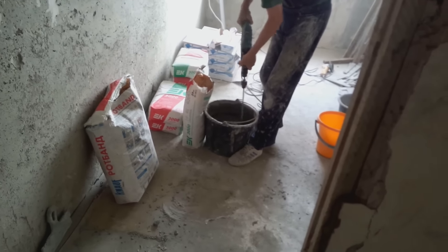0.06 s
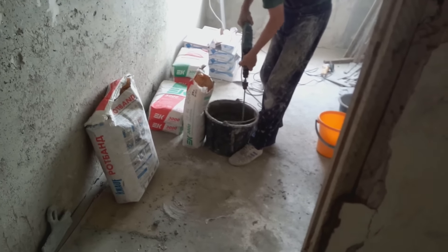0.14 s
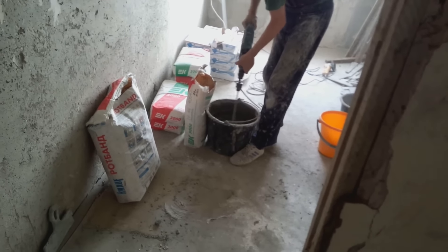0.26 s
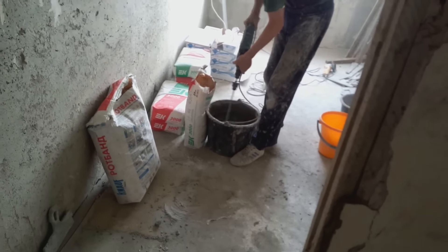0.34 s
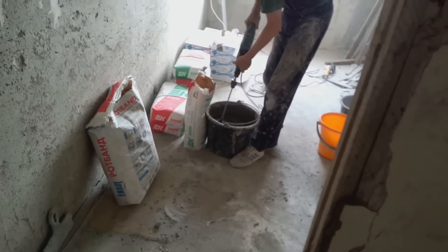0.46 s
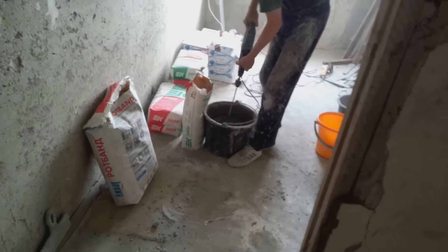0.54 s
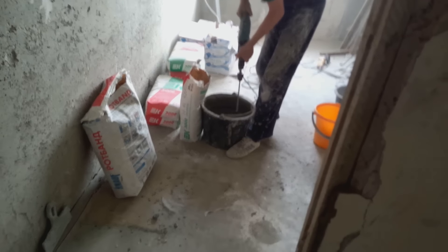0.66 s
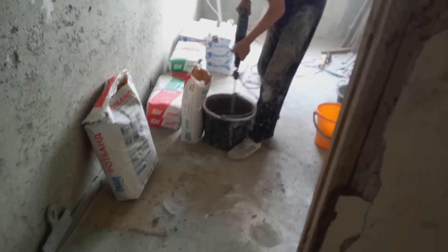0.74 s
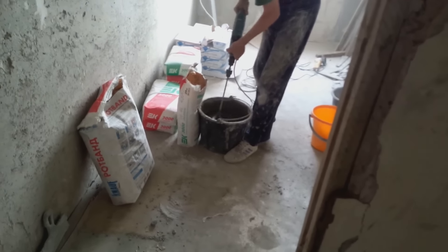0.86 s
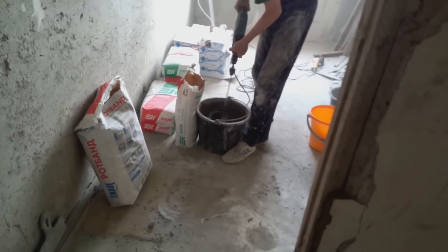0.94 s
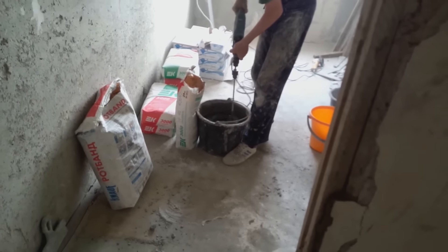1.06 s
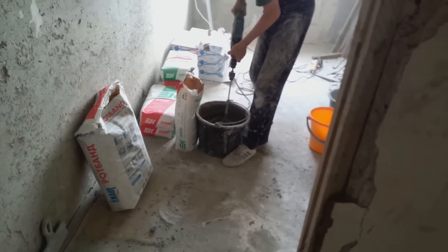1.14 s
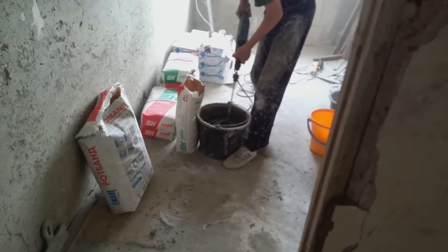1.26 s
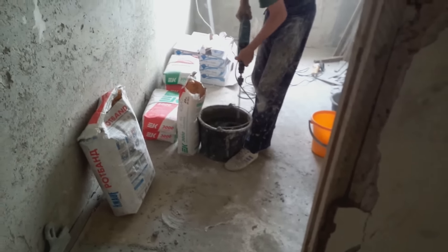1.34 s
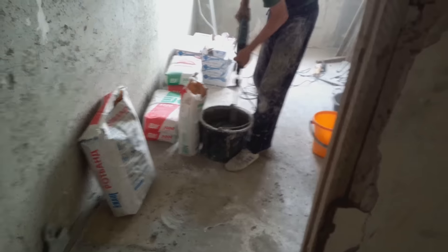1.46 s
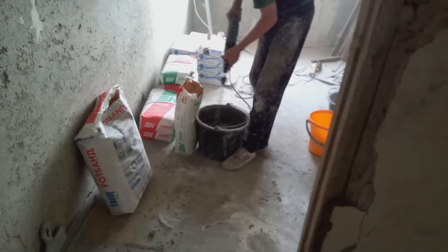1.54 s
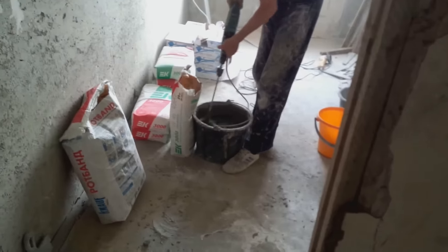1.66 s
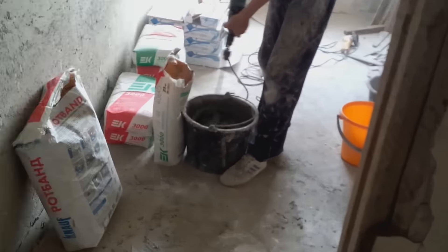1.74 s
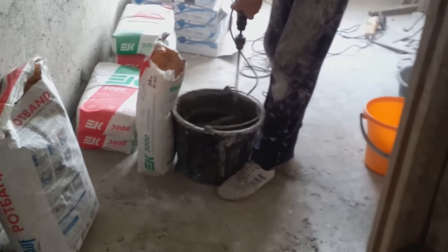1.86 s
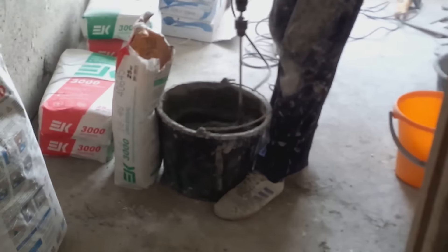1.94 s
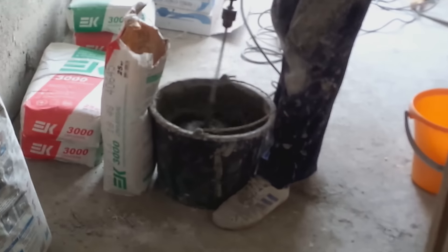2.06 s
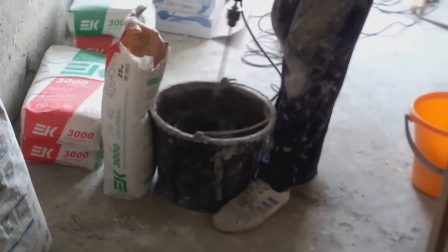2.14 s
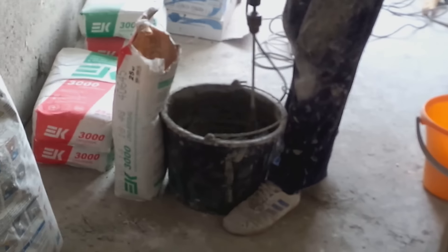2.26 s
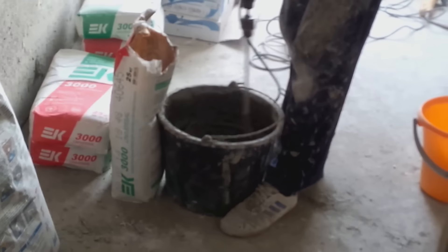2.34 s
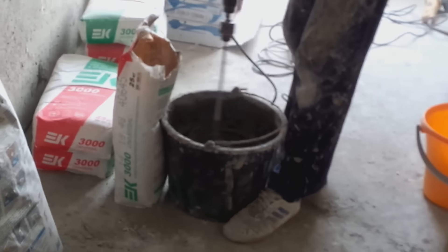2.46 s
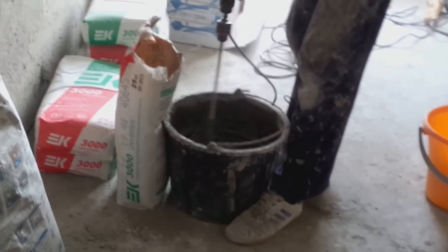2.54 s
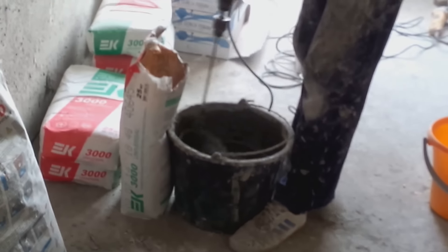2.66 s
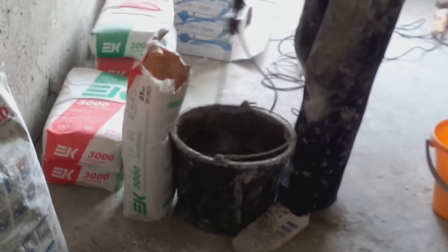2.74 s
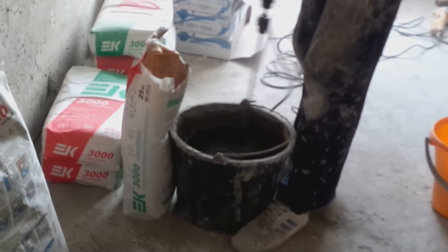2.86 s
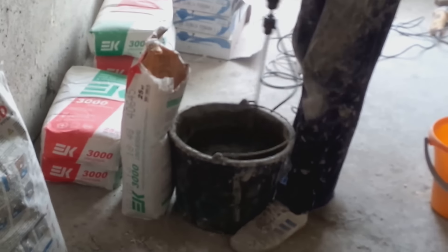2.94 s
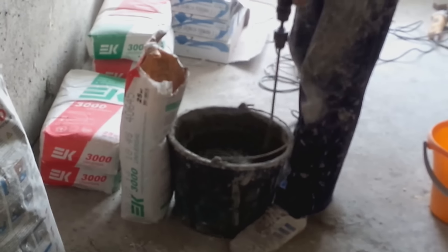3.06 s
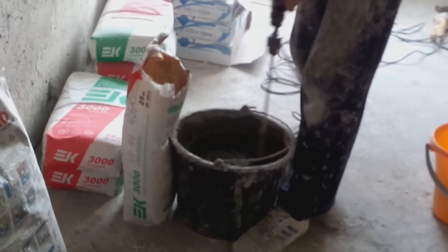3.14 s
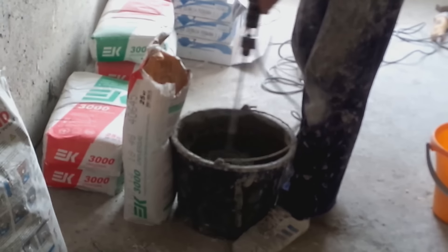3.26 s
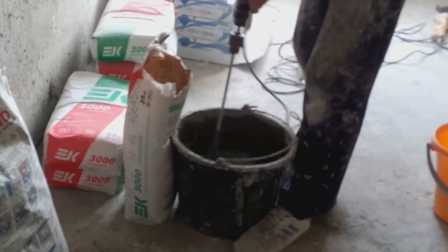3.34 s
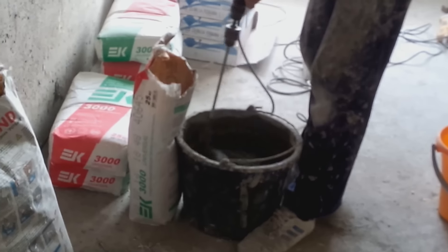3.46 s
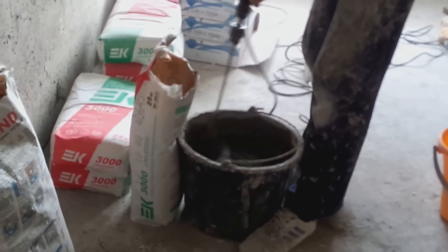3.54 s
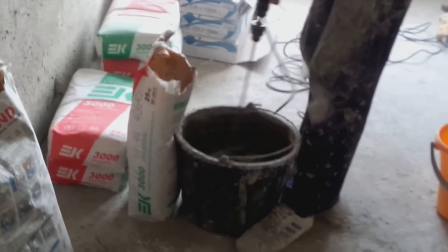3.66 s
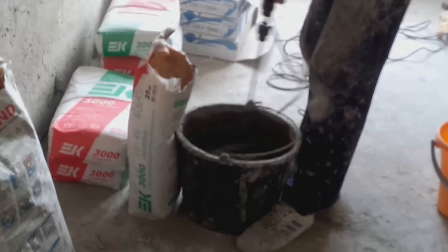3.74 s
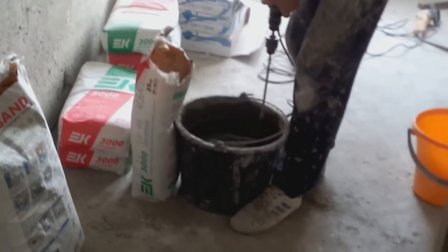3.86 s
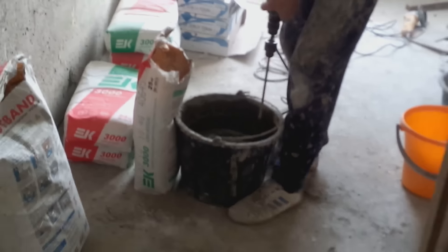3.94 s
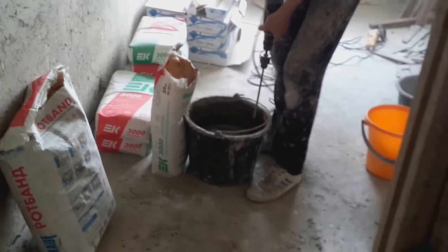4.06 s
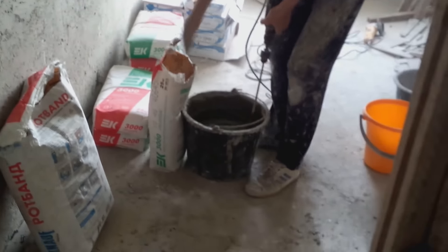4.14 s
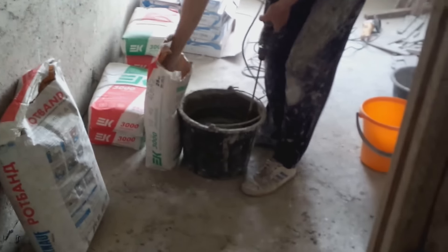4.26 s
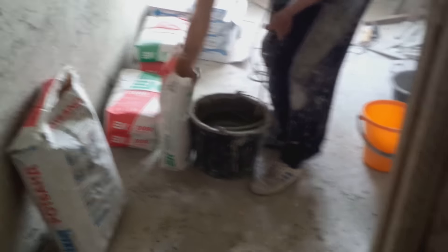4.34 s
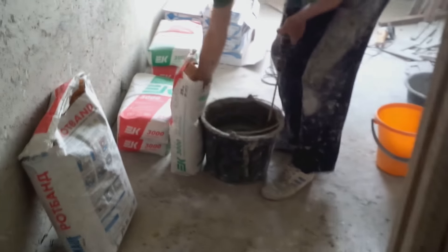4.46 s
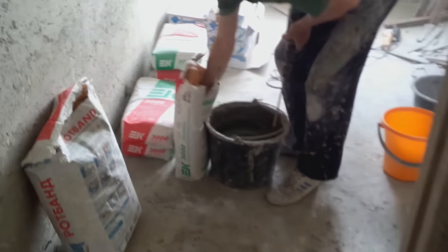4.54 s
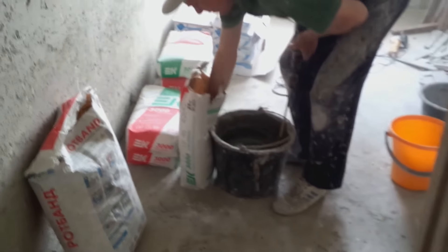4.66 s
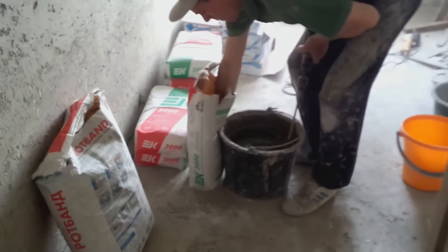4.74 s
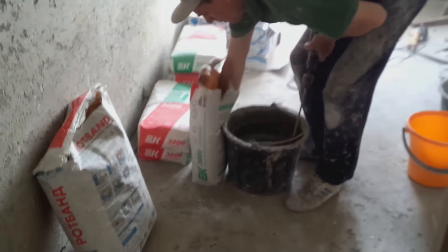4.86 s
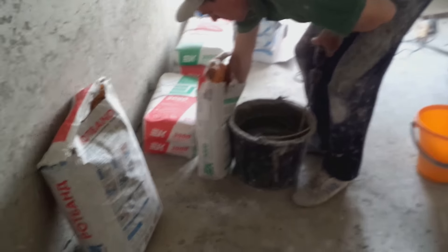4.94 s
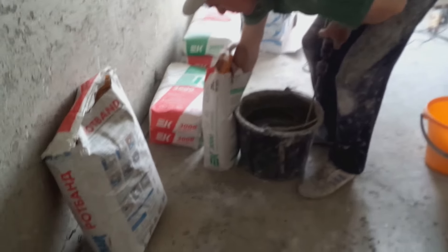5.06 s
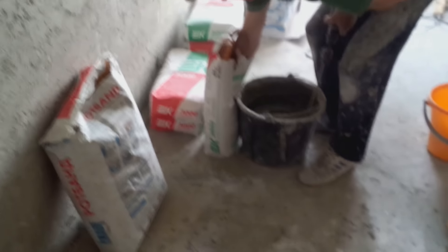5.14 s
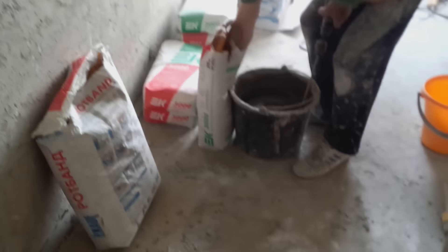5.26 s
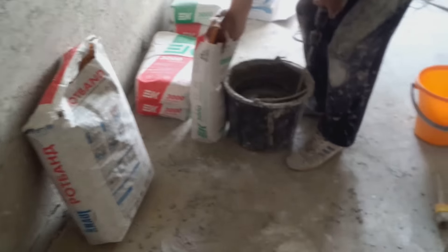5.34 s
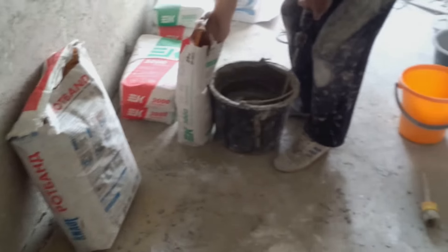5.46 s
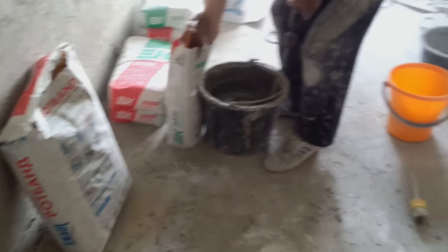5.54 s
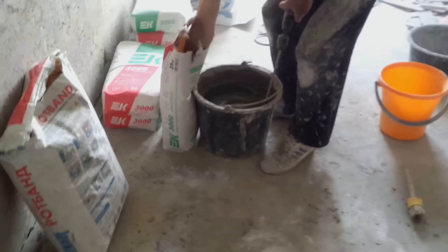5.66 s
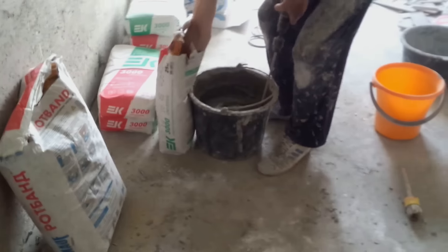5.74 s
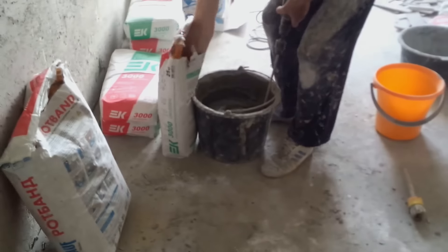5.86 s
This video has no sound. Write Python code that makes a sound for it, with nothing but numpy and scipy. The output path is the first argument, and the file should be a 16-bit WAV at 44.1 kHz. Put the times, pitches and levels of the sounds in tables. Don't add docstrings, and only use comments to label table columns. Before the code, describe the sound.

A geared electric drill whines and roars while mixing thick plaster in a bucket, then coasts down with clacking gears and a faint paper rustle.

```python
import sys
import numpy as np
from scipy import signal
from scipy.fft import rfft, irfft, next_fast_len
from scipy.io import wavfile
from scipy.ndimage import uniform_filter1d, map_coordinates

SR = 44100
rng = np.random.default_rng(int(sys.argv[2]) if len(sys.argv) > 2 else 0)


def wav_record(signal):
    frames = np.transpose(np.atleast_2d(signal))
    bounded = np.clip(frames, -1, 1)
    quanta = np.round(bounded * 32767).astype(np.int16)
    wavfile.write(sys.argv[1], SR, quanta)


def gain_from_db(level_db):
    decades = np.asarray(level_db, float) / 20
    return 10 ** decades


N = 260631


def unit(x):
    return x / np.sqrt(np.mean(x ** 2) + 1e-20)


def along(points, hz):
    f, v = np.transpose(points)
    return np.interp(np.log(hz + 1), np.log(f + 1), v)


def curves(rows):
    s, *cols = np.transpose(rows)
    return [np.interp(np.arange(N) / SR, s, c) for c in cols]


def wobble(rate):
    at = np.arange(0, N + 16, 16)
    knots = rng.standard_normal(int(N * rate / SR) + 4)
    return np.interp(np.arange(N), at, map_coordinates(knots, [at * rate / SR]))


def swells(rows, rise_s):
    t = np.arange(0, N / SR + .002, .002)
    gain = 0
    for s, length, db in rows:
        inside_s = length / 2 - np.abs(t - s - length / 2)
        gain = gain + gain_from_db(db) * np.clip(inside_s / rise_s + .5, 0, 1)
    return np.interp(np.arange(N) / SR, t, gain)


def coloured(x, spectrum):
    m = next_fast_len(N + 8192)
    gain = gain_from_db(along(spectrum, np.fft.rfftfreq(m, 1 / SR)))
    return irfft(rfft(x, m) * gain, m)[:N]


def rush(spectrum, patchy_db, gate=1):
    z = signal.stft(gate * rng.standard_normal(N), nperseg=512)[2]
    field = uniform_filter1d(rng.standard_normal(z.shape), size=5, axis=0)
    field = uniform_filter1d(field, size=12, axis=1)
    patchy = signal.istft(z * gain_from_db(patchy_db * unit(field)), nperseg=512)[1][:N]
    return unit(coloured(patchy, spectrum))


def room(x):
    # frequency in Hz, time to fall by 60 dB in seconds.
    walls = [(200, 0.28), (2000, 0.88), (8000, 0.45)]
    hz, t, z = signal.stft(rng.standard_normal(SR // 2), SR, nperseg=256)
    tail = signal.istft(z * gain_from_db(-60 * t / along(walls, hz)[:, None]), SR, nperseg=256)[1]
    return signal.fftconvolve(np.pad(x, (300, 0)), tail / np.linalg.norm(tail))[:N]


def bucket():
    # time in seconds, level in dB.
    depth = [(0.0, -32), (0.48, -34.5), (0.89, -34.5), (1.45, -47), (1.66, -50), (1.87, -41.5),
             (2.39, -48.5), (2.55, -42), (3.03, -38), (4.62, -41.5), (5.76, -52.5), (5.91, -56)]
    # frequency in Hz, level in dB per Hz.
    churn_colour = [(40, -29), (90, -9), (150, -4), (230, -0.5), (350, -0.5), (500, -7), (900, -48.5)]
    hum_colour = [(60, -42), (85, -7), (98, -4), (112, -13), (150, -40)]
    rumble_colour = [(10, -19), (25, -5), (40, 13), (65, -9), (110, -41)]
    # start in seconds, length in seconds, level in dB rms.
    surges = [
        (.07, 0.066, -44),
        (.4, 0.22, -31.5),
        (.62, 0.31, -43),
        (3.48, 0.32, -36),
        (4.6, .22, -33),
    ]
    # start in seconds, length in seconds, level in dB rms.
    thud_rows = [(.07, .1, -45), (.46, .06, -44), (.57, .12, -40), (1.08, .2, -48), (2.66, .07, -50),
                 (3.07, .12, -53), (3.48, .14, -51), (3.7, .14, -49), (3.88, .08, -52)]
    # start in seconds, length in seconds, level in dB rms.
    hums = [
        (.5, .85, -45),
        (2.9, 0.62, -55),
        (3.8, 1.055, -56),
        (4.9, 1, -64),
    ]

    churn_db, = curves(depth)
    lumps = unit(gain_from_db(1.6 * wobble(22)) * rush(churn_colour, patchy_db=1.2))
    churn = np.hypot(gain_from_db(churn_db + 1.75 * wobble(7)), swells(surges, rise_s=.04))

    still_db = -62
    floor = np.hypot(gain_from_db(churn_db - 17 + 2.5 * wobble(5.3)), gain_from_db(still_db))
    rumble = gain_from_db(0.5) * floor * rush(rumble_colour, patchy_db=5)

    thud_hz = 38.6
    note = np.sin(2 * np.pi * thud_hz * np.arange(N) / SR + 1.5 * wobble(12))
    thuds = swells(thud_rows, rise_s=.05) * np.sqrt(2) * note
    mains_hum = swells(hums, rise_s=.15) * rush(hum_colour, patchy_db=0.5)
    return churn * lumps + thuds + mains_hum + rumble


def sack():
    # start in seconds, length in seconds, level in dB rms.
    rubs = [
        (5.865, .1, -54),
    ]
    rustles = [
        (5.62, .19, -58),
        (5.814, .1, -54),
        (5.885, .1, -54),
    ]
    # frequency in Hz, level in dB per Hz.
    paper = [(300, -18), (1000, -2), (2500, 1), (4500, 2), (7500, -9), (9000, -18)]
    rub_colour = [(2000, -30), (2350, 0), (2500, -12), (2700, -2), (3100, -30)]  # Hz, dB per Hz
    rub = swells(rubs, rise_s=.02) * gain_from_db(3 * wobble(70)) * rush(rub_colour, patchy_db=2)
    rustle = swells(rustles, rise_s=.017) * gain_from_db(2 * wobble(150)) * rush(paper, patchy_db=1)
    return rub + rustle


def hits(rows, t60, trim_db):
    out = np.zeros(N + SR)
    t = np.arange(SR // 5) / SR
    for s, db, hz, crack in rows:
        ring = gain_from_db(-60 * t / t60) * np.sin(2 * np.pi * hz * t) * (1 - np.exp(-t * hz * 3))
        snap = crack * gain_from_db(-60 * t / 0.0094) * rng.standard_normal(len(t))
        out[round(s * SR):][:len(t)] += gain_from_db(db + trim_db) * (ring + snap)
    return out[:N]


def paddle_knocks():
    # time in seconds, peak in dB, note in Hz, share of crack.
    knock_rows = [(.138, -19, 225, .05), (.413, -19, 300, .05), (.462, -17, 280, .05),
                  (.485, -19, 270, .05), (.557, -19, 310, .05), (1.695, -18, 240, .08),
                  (4.63, -27, 230, .1), (4.66, -20, 370, .1), (4.694, -18, 250, .1), (4.727, -23, 280, .1),
                  (5.39, -36, 380, .1)]
    return hits(knock_rows, t60=.032, trim_db=6)


def gear_ticks():
    # time in seconds, peak in dB, note in Hz, share of crack.
    tick_rows = [
        (4.533, -9, 1752, 0.19),
        (4.576, -11, 1610, 0.24),
        (5.56, -33, 1121, .15),
        (5.809, -33.5, 1090, .12),
        (5.8155, -49, 1900, 6.8),
    ]
    return hits(tick_rows, t60=.02, trim_db=.1)


def speed():
    # time in seconds, tooth contacts in Hz.
    loaded = [(0, 882), (.163, 868.3), (.313, 864), (.528, 847), (.64, 843), (.836, 857.7), (.98, 847.5),
              (1.149, 860.4), (1.521, 876.2), (1.724, 876.4), (1.93, 887), (2.218, 878.6), (2.572, 883.7),
              (2.86, 896), (3.111, 890.6), (3.6, 910), (3.8, 909.6), (4.175, 900.7)]
    coast_s, rub_hz, creep_hz = 1.17, 300, 20
    off_s, off_hz = loaded[-1]
    since = np.clip(np.arange(N) / SR - off_s, 0, None)
    lost_hz = (off_hz + rub_hz) * (1 - np.exp(-since / coast_s))
    return np.maximum(curves(loaded)[0] - lost_hz, creep_hz)


def roar(mesh_hz, mesh):
    # frequency in Hz, level in dB per Hz.
    fast_colour = [(500, -30), (1100, -16), (1550, -4.5), (1760, -1.5), (2000, -6), (2650, -4.5),
                   (4270, -5.5), (5700, -10), (7000, -10.5), (9000, -21)]
    slow_colour = [(500, -28), (1100, -6), (1550, -6), (1800, 0), (2100, -2.5), (2650, -5), (4270, -9.5),
                   (5700, -14), (7000, -13.5), (9000, -13)]
    drone_colour = [(300, -24.5), (450, -10), (570, -10.5), (700, -3.5), (830, -1), (960, -4), (1150, -6.5),
                    (1500, -8.5), (2200, -29)]
    # time in seconds, level in dB.
    sway = [(0, 1), (.96, -1), (1.8, 0.5), (2.9, 0), (4.05, 0.5), (4.22, 1.5), (4.7, 1.5), (5.1, 0.5),
            (5.5, -0.5), (5.91, 7)]
    # start in seconds, length in seconds, dB rms.
    shudders = [
        (2.85, 0.16, -39),
        (4.14, 0.078, -29),
        (3.0, .35, -28),
        (4.6, 0.26, -28),
        (4.9, 0.09, -39),
        (5.36, .1, -43.5),
    ]
    sway_db = curves(sway)[0]
    decades = np.log10(mesh_hz / 880)
    hiss_db = -21 + sway_db + 28 * decades
    drone_db = -25 + sway_db + 19.5 * decades
    room_tone_db = -78
    drone = np.hypot(gain_from_db(drone_db), swells(shudders, rise_s=.05)) + gain_from_db(room_tone_db)

    teeth = 1 + (.42 - mesh_hz / 3000) * np.cos(mesh) + .1 * np.cos(2 * mesh)
    shake_db = 0.47 * wobble(8) + 0.25 * wobble(20)
    fade = np.pi / 2 * np.clip(mesh_hz / 850, 0, 1)
    air = np.sin(fade) * rush(fast_colour, patchy_db=0.93, gate=teeth)
    air = air + np.cos(fade) * gain_from_db(2.5) * rush(slow_colour, patchy_db=1.5, gate=teeth)
    hum = drone * gain_from_db(shake_db - 0.6) * rush(drone_colour, patchy_db=0.5)
    return gain_from_db(hiss_db + 2.5 + shake_db) * air + hum


def whine(mesh_hz, mesh):
    multiples = [2, 3, 4, 6, 2.6, 5, 7]
    # early level, late level, in dB rms.
    rest_levels = [(-30, -31), (-33, -36), (-36, -39), (-38, -48), (-38, -39), (-35, -41), (-39, -45)]
    # multiple of the tooth rate, early level, late level, in dB rms.
    faint = [(1, -38, -42), (.94, -39, -40), (2.075, -36, -37), (7.8, -46, -39), (8, -41, -42)]
    # start in seconds, length in seconds, level in dB rms.
    main_swells = [(0.004, 0.033, -14), (0.08, 0.03, -25), (0.127, 0.027, -24), (0.25, 0.028, -22.5),
                   (0.287, 0.046, -27), (0.384, 0.098, -17.5), (0.576, 0.11, -19), (0.722, 0.072, -21),
                   (0.845, 0.082, -17.5), (0.94, 0.062, -26), (1.04, 0.034, -20), (1.088, 0.024, -17.5),
                   (1.134, 0.07, -21.5), (1.227, 0.046, -19.5), (1.284, 0.051, -24), (1.339, 0.11, -16.5),
                   (1.494, 0.075, -20.5), (1.614, 0.033, -27), (1.72, 0.14, -21), (1.993, 0.23, -21.5),
                   (2.29, 0.033, -29), (2.389, 0.38, -20.5), (2.804, 0.13, -18), (2.98, 0.045, -23.5),
                   (3.225, 0.11, -22), (3.705, 0.49, -19.5)]
    # start in seconds, length in seconds, level in dB rms, multiple of the
    other_swells = [(2.403, 0.168, -17.5, 2), (4.08, 0.1, -21, 2), (0, 0.22, -27, 3), (.18, 0.25, -22, 3),
                    (.79, .2, -23, 3), (1.077, 0.06, -27, 3), (1.238, 0.28, -26.5, 3), (1.806, 0.4, -29, 3),
                    (2.74, 0.21, -29, 3), (3.178, 0.09, -24, 3), (3.9, .07, -25, 3), (4.05, 0.088, -25, 3),
                    (0.512, 0.22, -24.5, 4), (0.838, .2, -25.5, 4), (1.227, 0.2104, -28.5, 4),
                    (2.408, 0.18, -29.5, 4), (3.023, 0.18, -28.5, 4), (3.423, 0.038, -27, 4),
                    (3.856, 0.305, -28, 4), (.5, 0.26, -29.5, 6), (1.167, 0.089, -28, 6),
                    (1.39, .11, -28, 6), (1.982, .2, -29, 6), (2.581, 0.05, -26.5, 6),
                    (0.472, 0.3, -27.5, 2.6), (.85, 0.11, -27, 2.6), (1.31, 0.155, -25.5, 2.6),
                    (1.8, .09, -29, 2.6), (2.546, 0.24, -30.5, 2.6), (3.475, 0.28, -25.5, 2.6),
                    (0.532, .18, -28, 5), (.95, .1, -32, 5), (1.6, 0.57, -33.5, 5), (3.9, 0.34, -33, 5),
                   (0.602, .3, -34.5, 7), (.78, 0.27, -35, 6), (1.65, .27, -33.5, 6)]
    coast_swells = [(4.22, .08, -21, 2), (4.26, .16, -24, 3), (4.46, .06, -26, 3), (4.55, .14, -30, 3),
                    (4.36, .26, -31, 4), (4.685, .04, -20, 4), (4.42, .2, -32, 2.6), (4.9, .06, -33, 2.6),
                    (5.05, .12, -44, 6), (5.25, .12, -47, 7)]
    rows = [(*row, 2) for row in main_swells] + other_swells + coast_swells

    loose = 1 + 2 * np.clip(1 - mesh_hz / 820, 0, .25) / .25
    mesh = mesh + loose * (.11 * wobble(35) + .06 * wobble(110))
    slowing_db = 40 * np.log10(mesh_hz / 880)
    later = np.clip(np.arange(N) / SR / 4, 0, 1)

    def beads():
        return .3 * wobble(110) + .11 * wobble(35)

    def tone(k, gain):
        steady = (1 + loose * beads()) * np.sin(k * mesh)
        skirt = loose * beads() * np.cos(k * mesh)
        return np.sqrt(2) * gain / loose ** 0.41 * (steady + skirt)

    total = np.zeros(N)
    for k, (early, late) in zip(multiples, rest_levels):
        swell = swells([row[:3] for row in rows if row[3] == k], rise_s=.025)
        rest_db = early + (late - early) * later + 1.5 * loose + slowing_db + 3 * wobble(9)
        total += tone(k, np.hypot(swell, gain_from_db(rest_db)))
    for k, early, late in faint:
        faint_db = early + (late - early) * later + 2.2 + slowing_db + 2.4 * wobble(20)
        total += tone(k, gain_from_db(faint_db))
    return total


def housing(x):
    # frequency in Hz, level in dB.
    radiates = [(250, -30), (500, -12), (750, 0), (9000, 0)]
    return coloured(x, radiates)


def gear_case(sharp, mesh_hz):
    case_hz, width_hz = 1807, 16
    free = np.clip((720 - mesh_hz) / 60, 0, 1)
    b, a = signal.iirpeak(case_hz, case_hz / width_hz, SR)
    return signal.lfilter(b, a, free * sharp)


def scene():
    mesh_hz = speed()
    mesh = 2 * np.pi * np.cumsum(mesh_hz) / SR
    sharp = housing(whine(mesh_hz, mesh))
    sharp = sharp + gear_case(sharp, mesh_hz)
    blows = paddle_knocks() + gear_ticks()
    echoes = gain_from_db(-11.5) * room(sharp) + gain_from_db(-6) * room(blows)
    mono = bucket() + sack() + blows + roar(mesh_hz, mesh) + sharp + echoes
    return np.array([mono, mono])


def band_limit(x):
    return signal.sosfilt(signal.butter(12, 11820, fs=SR, output="sos"), x)


def record(dry):
    # frequency in Hz, level in dB.
    edge = [(6900, -1), (7300, -5.5), (7600, -17), (7850, -29.5), (8000, -39), (8300, -120)]
    mirror = [(7900, 0), (8800, -6), (10000, -17.5), (11000, -28), (11800, -43), (13000, -64), (14300, -64),
              (14500, -120)]
    clock_hz, offset = 16000, -.0117
    held = dry[0] / (1 + np.abs(dry[0] / .8) ** 4) ** (1 / 4)
    band = coloured(held, edge)
    image = 2 * band * np.cos(2 * np.pi * clock_hz * np.arange(N) / SR)
    mono = band + coloured(image, [(7700, -120)] + mirror) + offset
    return band_limit(np.array([mono, mono]))


dry = scene()
out = record(dry)
wav_record(out)
```